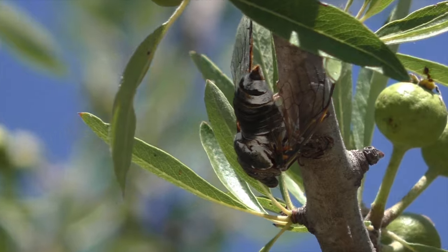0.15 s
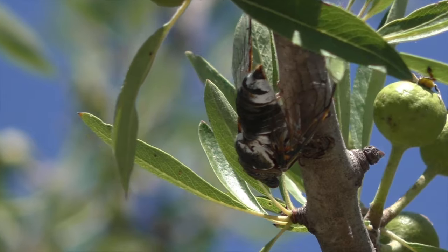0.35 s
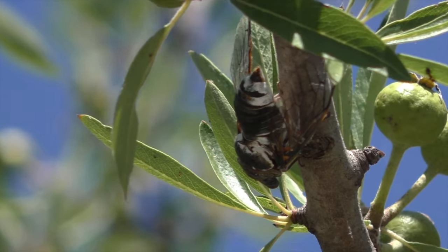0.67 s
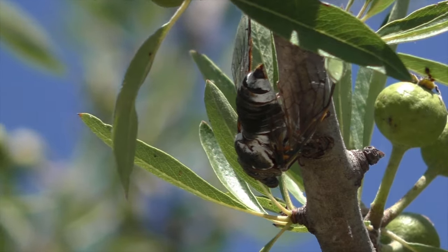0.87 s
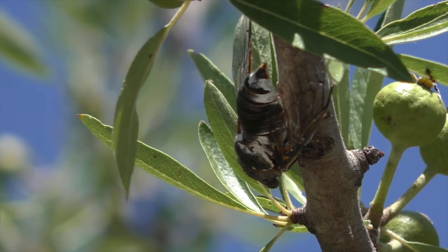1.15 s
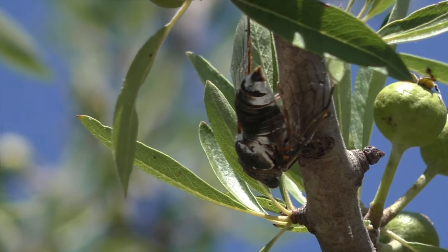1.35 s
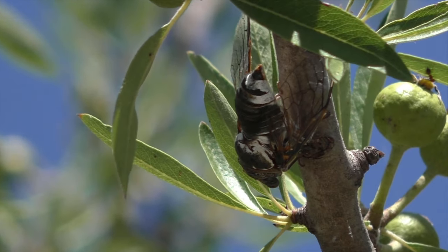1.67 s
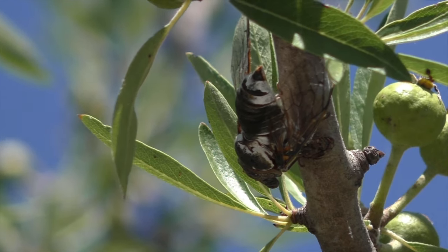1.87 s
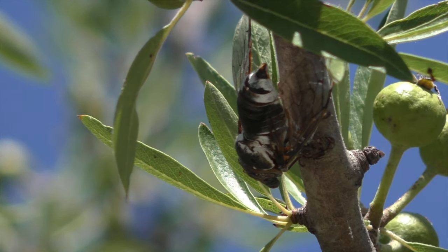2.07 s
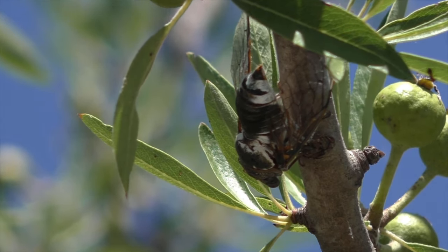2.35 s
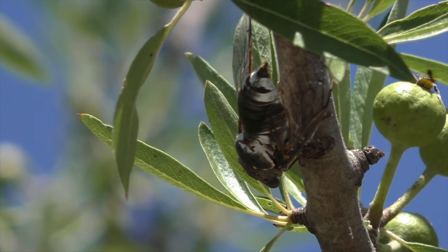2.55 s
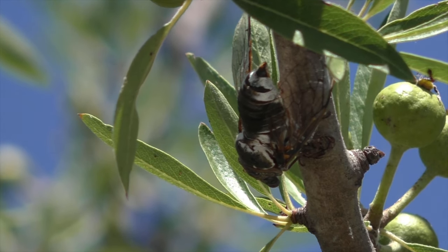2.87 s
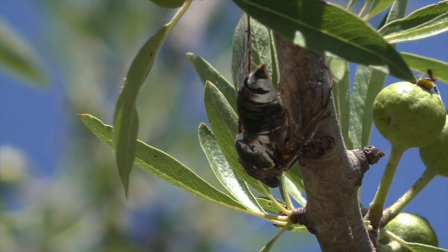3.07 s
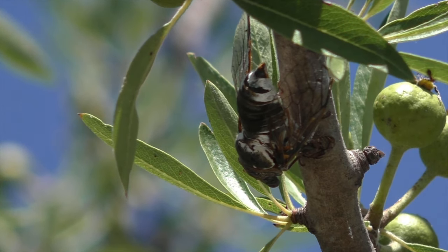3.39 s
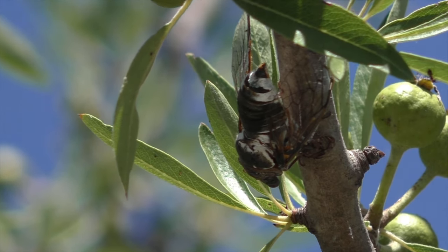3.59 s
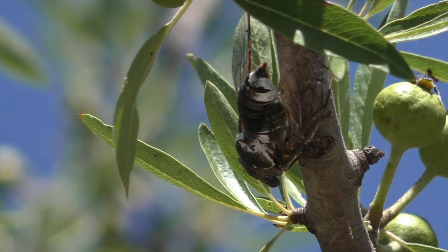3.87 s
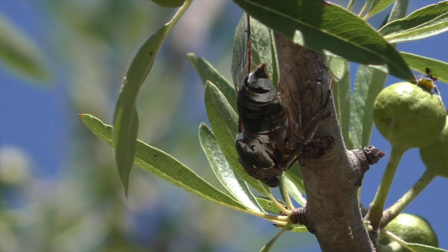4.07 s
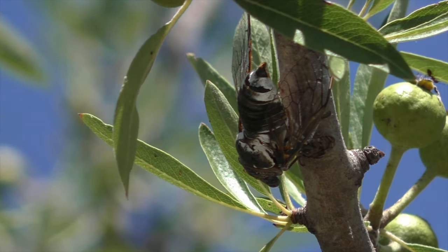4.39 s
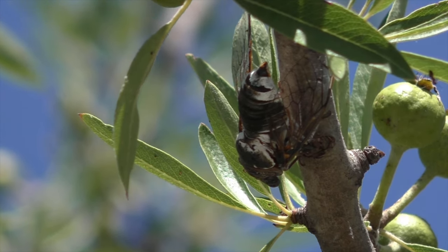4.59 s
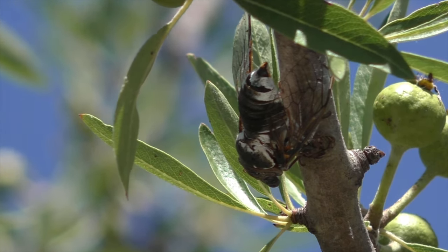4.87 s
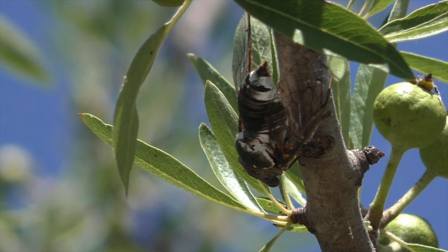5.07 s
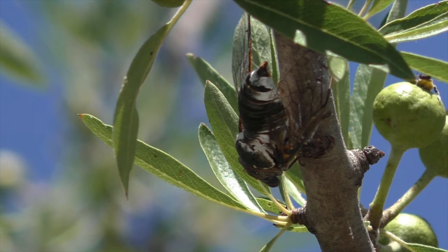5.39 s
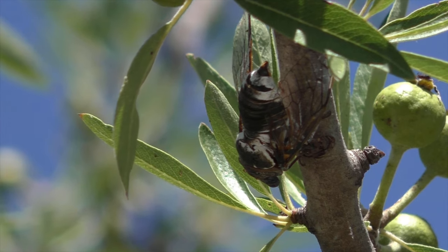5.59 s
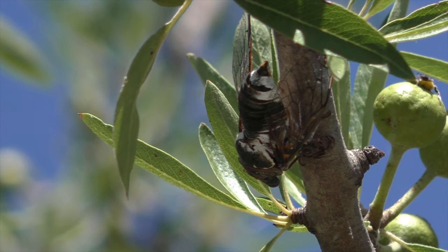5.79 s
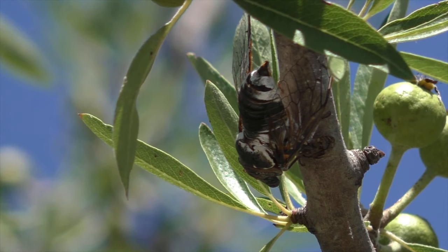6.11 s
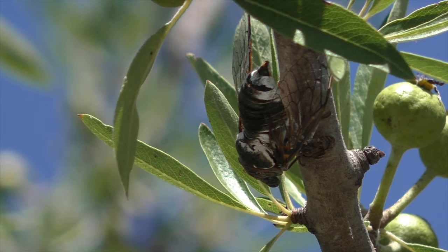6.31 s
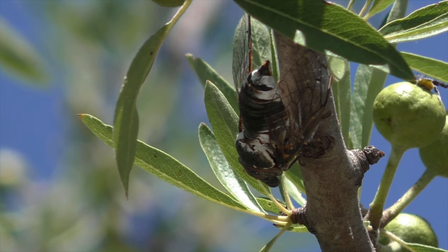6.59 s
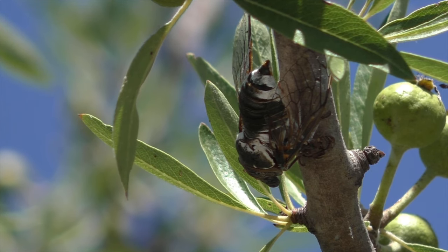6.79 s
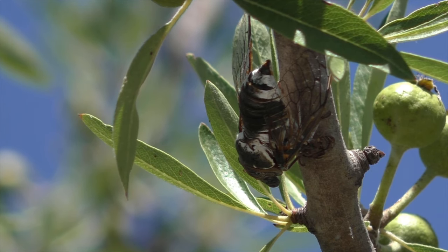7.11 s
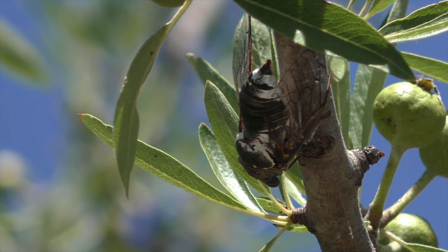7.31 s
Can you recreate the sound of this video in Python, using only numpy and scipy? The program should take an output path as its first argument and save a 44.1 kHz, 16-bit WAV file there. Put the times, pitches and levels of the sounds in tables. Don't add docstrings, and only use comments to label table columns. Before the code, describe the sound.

A single cicada on a branch close to the microphone sings without a break: a bright, shrill, dry buzz pulsing about twelve times a second. Midway the pulsing becomes irregular and fades while the buzz slows into a coarser rattle, dipping slightly before growing strong again. Far behind are other cicadas, faint bush cricket scrapes and very low town rumble. Open air, nearly mono.

```python
import sys
import numpy as np
from scipy import signal
from scipy.fft import rfft, irfft
from scipy.io import wavfile
from scipy.ndimage import uniform_filter1d

SR = 44100
rng = np.random.default_rng(int(sys.argv[2]) if len(sys.argv) > 2 else 0)


def decibels_to_gain(level_db):
    exponent = np.asarray(level_db, float) / 20
    return 10 ** exponent


def store_wav(level_fs):
    pcm = np.round(np.clip(np.atleast_2d(level_fs), -1, 1) * 32767)
    wavfile.write(sys.argv[1], SR, pcm.T.astype(np.int16))


N = 328545
TIME = np.arange(N) / SR
HZ = np.arange(N // 2 + 1) * SR / N

# [t/s, buckling rate f/Hz, time from rib to rib/ms]
DRUM_BUCKLING = [(0, 342.3, 1.45), (1.8, 339.2, 1.68), (2.6, 332.6, 1.42), (3.4, 320.6, 1.7),
                 (4, 303.2, 1.58), (4.5, 288.7, 1.66), (4.6, 238.8, 1.47), (5.1, 229, 1.51),
                 (5.8, 217.8, 1.5), (6.2, 202.6, 1.44), (6.6, 193.7, 1.47), (7, 180.4, 1.47),
                 (7.45, 178.6, 1.53)]
# [t/s, level/dB, plate level above 8 kHz/dB, belly pumping/0-1, plate sag through a throb/dB,
# outer belly rings/dB per 2 kHz off centre, belly centre f/Hz]
SONG = [(0, -10, -8, 0.9, 2, -1.5, 6900), (.5, -10.5, -9, 0.98, 1, -1.5, 7000),
        (1.8, -12, -8.5, 1, 5, -3.5, 6900), (2.4, -11.5, -9, 0.68, -2, -1, 6950),
        (3.9, -11, -8.5, 0.66, 1.5, -2, 7000), (4.4, -13, -8, 0.2, 4, -2.5, 6700),
        (4.8, -15, -6, .4, 0, -2, 6500), (5.3, -13.5, -5.5, 0.17, -1, -2.5, 6340),
        (5.8, -10, -6.5, 0, 2, -3, 6300), (6.3, -10.5, -6.5, 0.4, 2, -2, 6400),
        (6.5, -9.5, -8.5, 0.3, 0, -5.5, 6600), (7.45, -9, -10, .2, 0, -6, 6590)]
# [end of a rest t/s, rest length/ms, level/dB, fade into the rest/ms]
PUMPING = [(-0.004, 37, -8, 28), (0.94, 27, -11.5, 39), (1.462, 38, -10, 25), (2.155, 24, -8, 17),
           (2.326, 27, -15.5, 13), (3.198, 23.4, -11, 11), (3.705, 25, -24, 12), (4.123, 25.5, -48, 8.7),
           (4.366, 28, -15, 5.1), (4.703, 28, -6, 25), (5.01, 22, -5, 22), (5.24, 21, -12.5, 5),
           (5.636, 14.6, -24, 6), (6.113, 15, -13, 3.94), (6.355, 8.8, -20, 3.7)]
THROBS_SUNG = [0, 11, 17, 25, 27, 37, 43, 48, 51, 55, 59, 62, 67, 73, 76]
# [f/Hz, width/Hz, level/dB, change from start to end of a throb/dB]
BELLY_RINGS = [(4486, 320, -10, -11), (4997, 290, -2.5, -19), (5784, 310, -1.5, -24.5),
               (6417, 400, 2, -6.5), (7108, 510, 4, 8.5), (7840, 550, 0.5, -8.5)]
# [f/Hz, width/Hz, level/dB]
PLATE_RINGS = [(8670, 410, 8), (9640, 866, 5.5), (10150, 770, 0), (11700, 830, -19), (13800, 900, -13),
               (15100, 820, -15)]
# [f/Hz, lag/turns]
BRANCH_LAG = [(0, -7.4), (2629, .5), (5299, 8.5), (8958, 19.5), (11993, 28.5), (15418, 38.5), (22050, 57.8)]
# [f/Hz, echo share/0-1]
BRANCH_SHARE = [(2000, 0.35), (6000, 0.25), (9000, 0.03), (12000, 0.47), (16000, 0.6)]
# [t/s, level/dB]
FAR_SWELL = [
    (0, 1),
    (.6, -0.5),
    (1.8, -1.5),
    (3, 1),
    (4.6, -3.5),
    (5.5, 1),
    (6.3, 5.5),
    (7.45, 5),
]
# [f/Hz, level/dB per Hz]
CHORUS_SPECTRUM = [(1700, -36.5), (2000, -7), (2400, -1), (3200, -2.5), (3900, -4), (4400, 3.5),
                   (6000, -16.5), (16000, -31)]
# [f/Hz, level/dB per Hz]
NEIGHBOUR_SPECTRUM = [(3800, -34.5), (4400, 0), (5500, 1.5), (7000, 3), (8500, -8.5), (10500, -10),
                      (11500, -20), (16000, -32)]
# [peak t/s, level/dB]
CRICKET_CHIRPS = [(.03, -40), (.5, -38), (.89, -38), (1.38, -39), (1.81, -38), (2.27, -42), (2.67, -37),
                  (3.13, -37), (3.56, -39), (4.01, -35), (4.46, -44), (5.12, -40), (5.64, -35), (6.12, -35),
                  (6.6, -30.5), (7.05, -30.5), (7.211, -36)]
# [f/Hz, level/dB per Hz]
SCRAPE_SPECTRUM = [(10000, -36), (11000, -8), (12000, 0), (12600, -7), (13800, -36)]
# [f/Hz, level/dB per Hz]
RUMBLE_SPECTRUM = [(12, -45), (20, -18), (62, -6.5), (203, 1), (350, -2), (430, -7), (529, -19), (716, -19),
                   (897, -31), (1580, -43), (1800, -16), (2340, -56), (3960, -120)]
# [f/Hz, level/dB per Hz]
SIDE_LOW_SPECTRUM = [(12, -37), (20, -3), (260, -3), (381, -8), (515, -26), (687, -23), (900, -68),
                     (1170, -98), (1980, -120)]
# [t/s, level/dB]
PREAMP_TICKS = [(0.021, -42), (0.1, -42), (0.189, -43), (0.274, -40), (0.343, -45), (0.427, -48),
                (0.445, -47), (0.871, -45), (0.953, -40), (1.043, -47), (1.294, -44), (2.173, -42),
                (2.193, -49), (2.254, -50), (2.964, -45), (3.403, -43), (3.47, -41), (3.489, -42),
                (4.477, -48), (4.559, -45), (5.937, -48), (6.082, -42), (6.151, -44), (6.312, -41),
                (6.411, -45), (6.454, -37), (6.472, -44), (7.22, -45)]


def level(x, db):
    return x * decibels_to_gain(db) / np.sqrt(np.mean(x ** 2))


def curves(table):
    s, *columns = np.transpose(table)
    return [np.interp(TIME, s, column) for column in columns]


def over_hz(table):
    hz, value = np.transpose(table)
    return np.interp(np.log(HZ + 1), np.log(hz), value)


def coloured(table):
    white = rfft(rng.standard_normal(N))
    return level(irfft(white * decibels_to_gain(over_hz(table)), N), 0)


def walk(rate):
    hold = int(SR / rate)
    steps = np.repeat(rng.standard_normal(N // hold + 1), hold)
    return 1.3 * uniform_filter1d(uniform_filter1d(steps, hold), hold)[:N]


def rib_clicks(jitter_ms=0.048, rib_jitter_ms=0.057, scatter_db=0.0):
    ribs_db, other_drum_db = [3.5, 4, -4.5], 2
    hz, gap_ms = curves(DRUM_BUCKLING)
    turns = np.cumsum(hz * (1 + 0.012 * walk(40))) / SR
    start = np.interp(np.arange(int(turns[-1])), turns, TIME)
    chance = rng.standard_normal((len(start), 7))
    jitter = (jitter_ms * chance[:, :1] + rib_jitter_ms * chance[:, 1:4]) / 1000
    gap = np.interp(start, TIME, gap_ms)[:, None] / 1000
    when = start[:, None] + np.arange(3) * gap + jitter
    other_drum = np.arange(len(start))[:, None] % 2
    db = np.array(ribs_db) + other_drum_db * other_drum + scatter_db * chance[:, 4:]
    fits = (np.arange(3) + 0.75) * gap < 1 / np.interp(start, TIME, hz)[:, None]
    return when[fits], decibels_to_gain(db[fits])


def throbs(when, rise_share=0.65, lead=0.071, wobble_ms=1.3, depth_spread=0.058, throb_db=0.44):
    count = np.arange(THROBS_SUNG[-1] + 1)
    chance = rng.standard_normal((len(count), 3)).T
    columns = np.transpose(PUMPING)
    end, length_ms, depth_db, fall_ms = (np.interp(count, THROBS_SUNG, c) for c in columns)
    end = end + wobble_ms / 1000 * chance[0]
    depth_db = depth_db * (1 + depth_spread * chance[1])
    done = np.interp(when, end, count, right=count[-1] + 0.4)
    near = np.clip(np.ceil(done - 0.25).astype(int), 0, count[-1])
    to_end_ms, fall_ms = 1000 * (end[near] - when), fall_ms[near]
    falling = np.clip((length_ms[near] - to_end_ms) / fall_ms + 0.5, 0, 1)
    rising = np.clip(to_end_ms / (rise_share * fall_ms) + 0.5, 0, 1)
    rest_db = depth_db[near] * falling * rising
    return (done + lead) % 1, rest_db + throb_db * chance[2][done.astype(int)]


def ring(when, size, hz, width, slip):
    at = np.clip(np.ceil(when * SR).astype(int), 0, N - 1)
    clicks = np.zeros(N, complex)
    np.add.at(clicks, at, size * np.exp(2j * np.pi * hz * (at / SR - when) + 1j * slip))
    pole = np.exp((2j * np.pi * hz - np.pi * width) / SR)
    twice = np.convolve([1, -pole], [1, -pole])
    return signal.lfilter([(1 - abs(pole)) ** 2], twice, clicks).imag


def cicada(colour_db=2.0, slip=0.43):
    when, size = rib_clicks()
    run, rest_db = throbs(when)
    song_db, edge_db, pump, sag_db, outer_db, centre_hz = (np.interp(when, TIME, c) for c in curves(SONG))
    size = size * decibels_to_gain(song_db + rest_db)
    chance = rng.standard_normal((len(when), 24)).T
    own, turn = decibels_to_gain(colour_db * chance[:12]), slip * chance[12:]
    out = 0
    for k, (hz, width, db, change_db) in enumerate(BELLY_RINGS):
        ring_db = db + change_db * pump * (run - 0.5) + outer_db * abs(centre_hz - hz) / 2000
        out = out + ring(when, size * own[k] * decibels_to_gain(ring_db + 26), hz, width, turn[k])
    for k, (hz, width, db) in enumerate(PLATE_RINGS, start=len(BELLY_RINGS)):
        ring_db = db + edge_db + sag_db * (run - 0.5)
        out = out + ring(when, size * own[k] * decibels_to_gain(ring_db + 22), hz, width, turn[k])
    return out


def leaves(x, t60=0.06, wet_db=-17):
    t = TIME[:SR // 3]
    tail = rng.standard_normal(len(t)) * decibels_to_gain(-60 * t / t60) * np.clip(t / 0.0068, 0, 1)
    tail = tail / np.sqrt(np.sum(tail ** 2))
    return x + decibels_to_gain(wet_db) * signal.fftconvolve(x, tail)[:N]


def branch_echo():
    lag_turns = np.interp(HZ, *np.transpose(BRANCH_LAG))
    return 1 + np.clip(over_hz(BRANCH_SHARE), 0, 0.9) * np.exp(-2j * np.pi * lag_turns)


def chorus(far_db, width=0.074, own_db=1.86):
    crowd = rfft(coloured(CHORUS_SPECTRUM))
    far = irfft(crowd, N)
    for hz in np.geomspace(2000, 4200, 8):
        band = np.exp(-(np.log(HZ / hz + 1e-9) / width) ** 2)
        far = far + irfft(crowd * band, N) * (decibels_to_gain(own_db * walk(5)) - 1)
    neighbours = coloured(NEIGHBOUR_SPECTRUM) * decibels_to_gain(-23.5 + walk(9))
    return far * decibels_to_gain(far_db - 41) + neighbours


def cricket(rise=0.09, fall=0.73):
    swell = 0
    for s, db in CRICKET_CHIRPS:
        span = np.where(TIME < s, rise, fall * rise)
        swell = swell + decibels_to_gain(db) * np.exp(-((TIME - s) / span) ** 2)
    return swell * coloured(SCRAPE_SPECTRUM) * decibels_to_gain(0.9 * walk(140))


def rumble(far_db):
    return coloured(RUMBLE_SPECTRUM) * decibels_to_gain(far_db - 51 + 0.51 * walk(2.795))


def side_noise(far_db):
    song = coloured([(1800, -28.5), (2100, -11), (4800, -2), (5600, -10), (6200, -90)])
    return coloured(SIDE_LOW_SPECTRUM) * decibels_to_gain(far_db - 71.5) + song * decibels_to_gain(far_db - 56.5)


def ticks(width_ms=2.8):
    out = np.zeros(N)
    for s, db in PREAMP_TICKS:
        out += decibels_to_gain(db - 5) * np.exp(-((TIME - s) * 1000 / width_ms) ** 2)
    return out * coloured([(200, -20), (500, -2), (1500, 0), (2500, -20)])


def scene():
    far_db, = curves(FAR_SWELL)
    small_body = 1 / (1 + (3400 / (HZ + 1)) ** 8)
    near = rfft(leaves(cicada())) * small_body
    singers = irfft((near + rfft(chorus(far_db) + cricket())) * branch_echo(), N)
    mid = singers + rumble(far_db) + ticks()
    side = side_noise(far_db)
    return np.array([mid + side, mid - side])


def roll_off(x):
    return signal.sosfilt(signal.butter(12, 15830, fs=SR, output="sos"), x)


def record(dry):
    return roll_off(dry)


dry = scene()
out = record(dry)
store_wav(out)
```